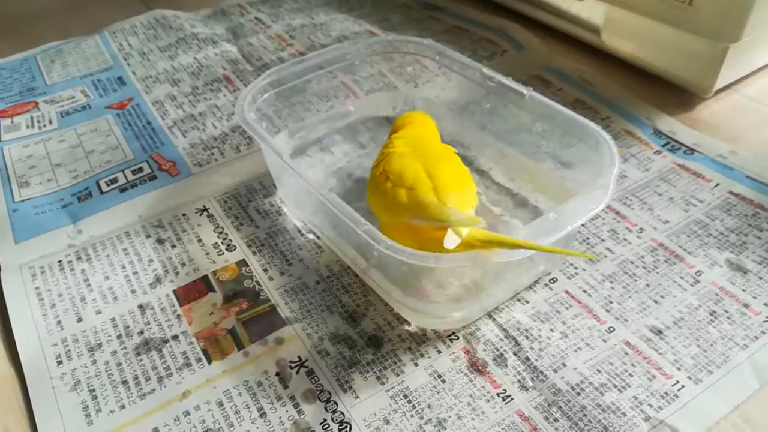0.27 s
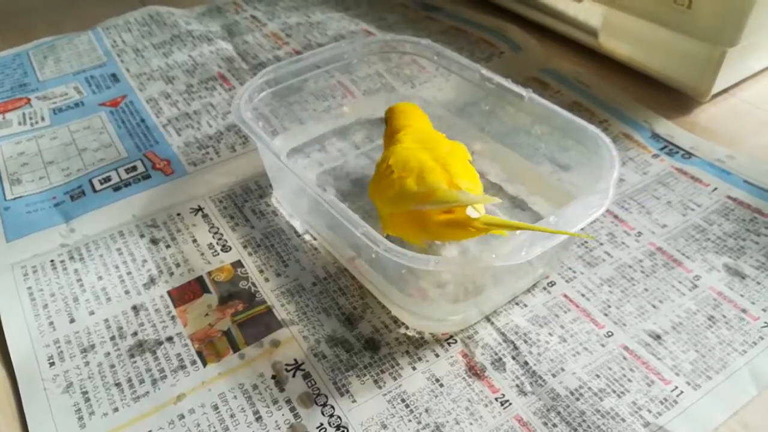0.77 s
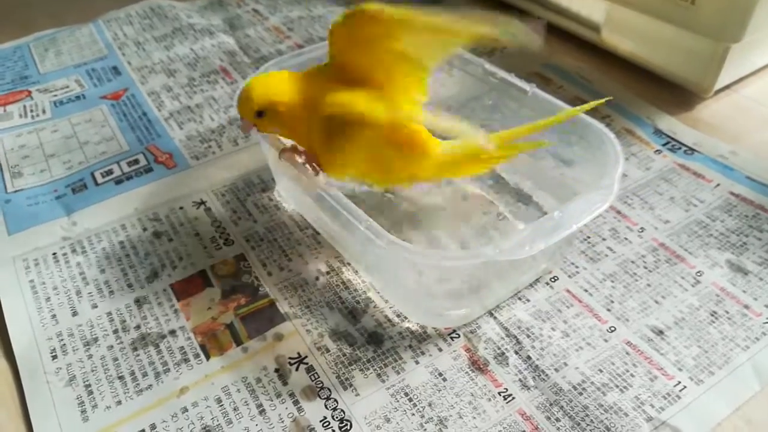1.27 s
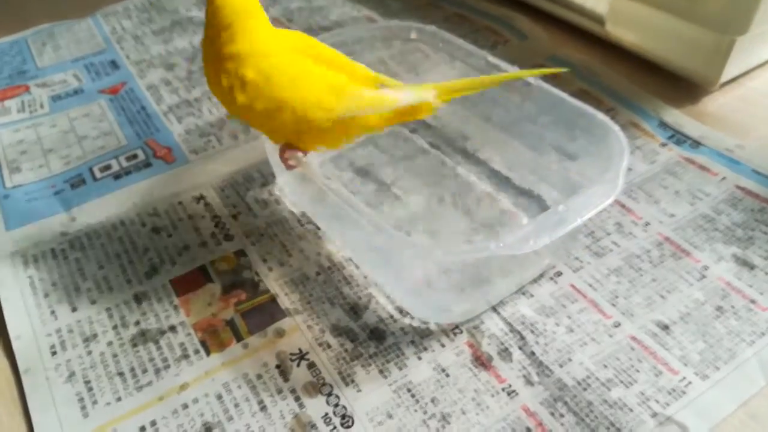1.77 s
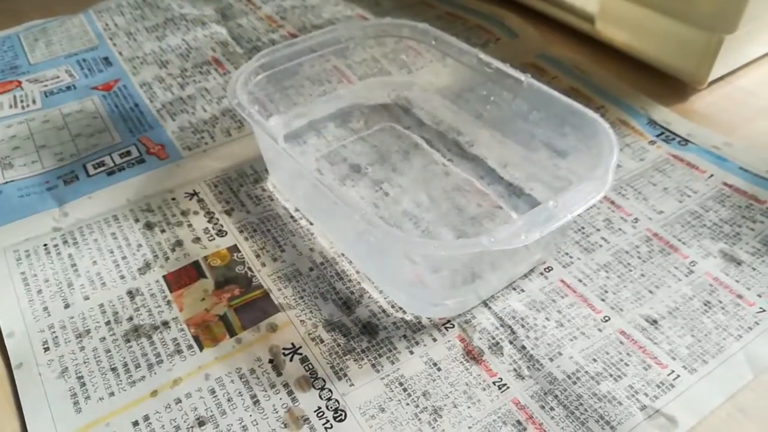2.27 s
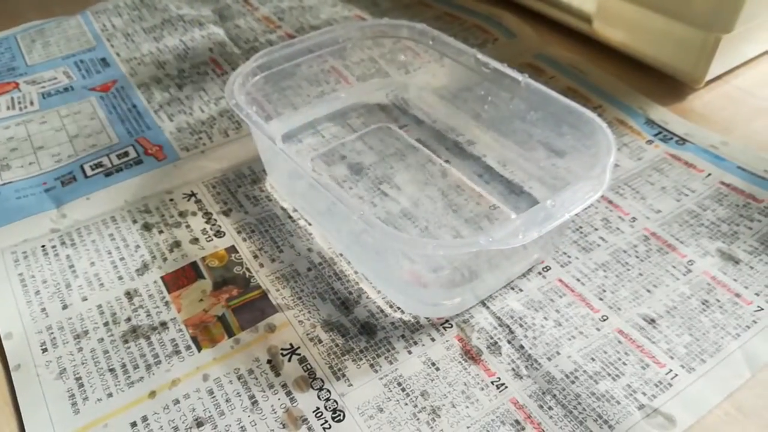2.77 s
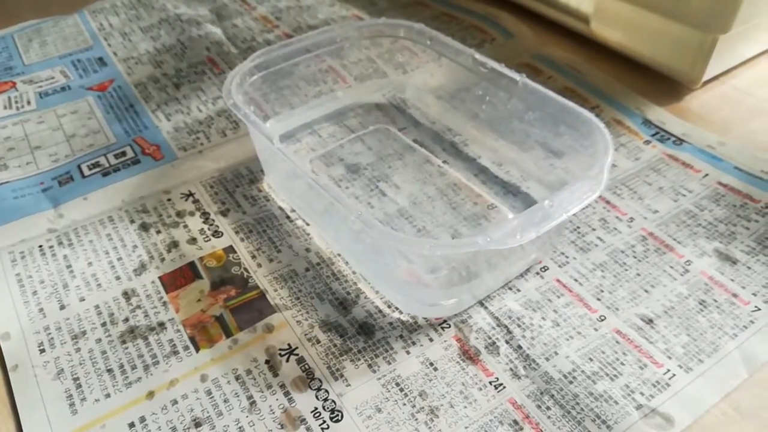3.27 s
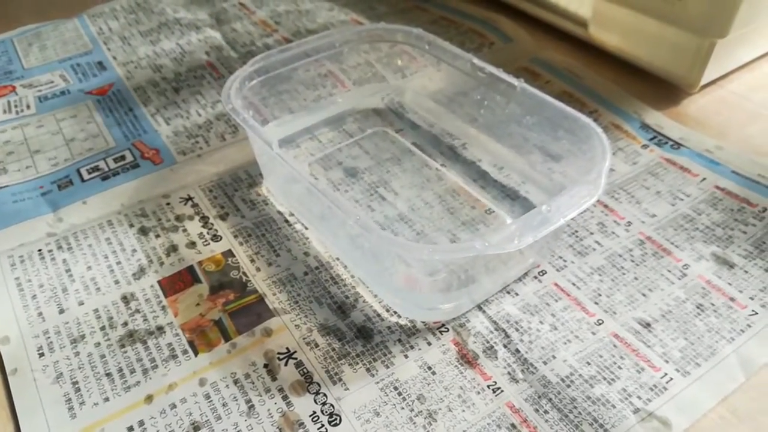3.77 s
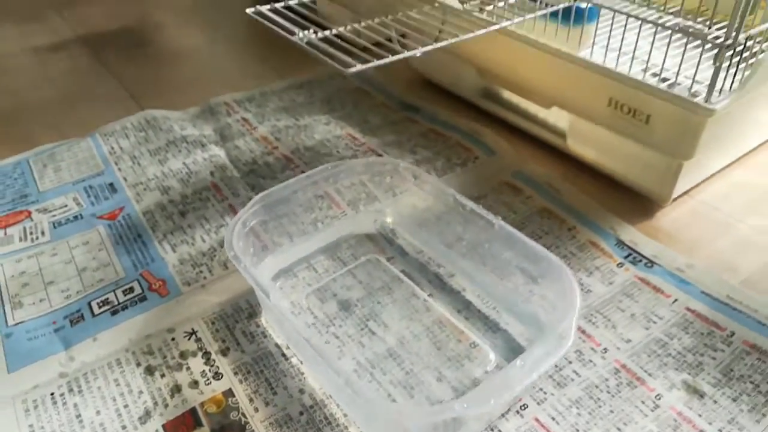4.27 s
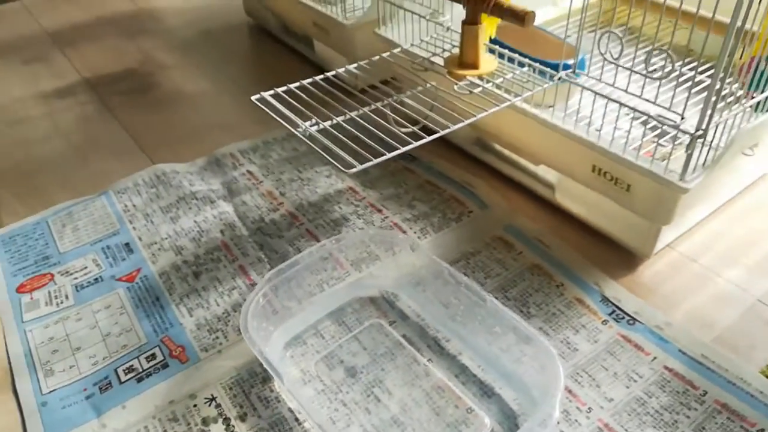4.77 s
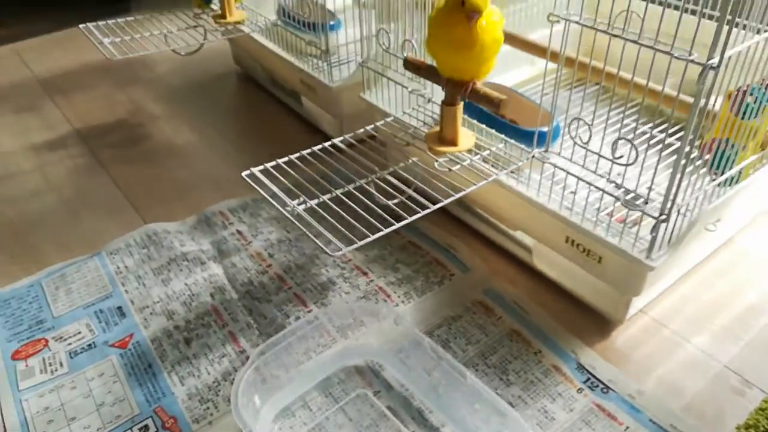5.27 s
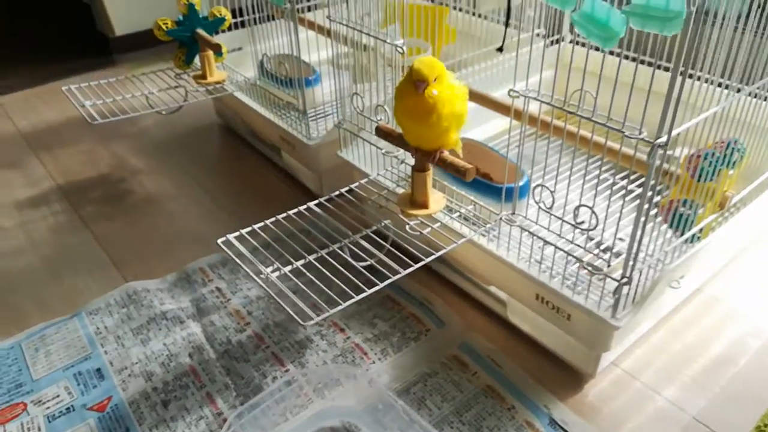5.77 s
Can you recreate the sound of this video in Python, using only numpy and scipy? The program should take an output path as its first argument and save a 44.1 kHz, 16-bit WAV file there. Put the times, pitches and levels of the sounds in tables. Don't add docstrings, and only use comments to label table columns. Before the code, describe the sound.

Complete silence until about 0.25 s, when the microphone wakes with a dull low thump; a faint toy bell dies away over quiet room tone and a low appliance hum. From 1.0 to 1.8 s, tiny crisp claw ticks and water drops tap a plastic tub and paper close by, with a harder foot strike on the rim at 1.33. At 1.9 comes the loudest sharp kick, feather rustle and three or four low wing pushes until 2.0, with drops spattering. A light rattle at 2.1, then from 2.7 to 3.1 the wire cage clatters, rings and squeaks a little farther away. At 3.65-3.87 a small bird makes a quick rising, warbling, falling whistle ending in a buzzy squawk, with short room echo. From 4.07 to 4.63, rapid light pecks on wires with faint bell trembling. From 5.1 to 5.8, soft claw clicks, weak rattles and squeaks on a perch.

```python
import sys
import numpy as np
from scipy import signal
from scipy.fft import rfft, irfft
from scipy.io import wavfile
from scipy.ndimage import uniform_filter1d

SR = 44100
rng = np.random.default_rng(int(sys.argv[2]) if len(sys.argv) > 2 else 0)


def materialize(psi):
    bounded = np.clip(np.atleast_2d(psi).T, -1, 1)
    quanta = np.round(bounded * 32767).astype(np.int16)
    wavfile.write(sys.argv[1], SR, quanta)


def field_ratio(decibels):
    return 10 ** (np.asarray(decibels, dtype=float) / 20)


N = 264952
T = np.arange(N) / SR
WAKE_AT = 11181


def evened(x):
    return x / np.sqrt(np.mean(x ** 2) + 1e-30)


def read(points, hz):
    f, value = np.transpose(points)
    return np.interp(np.log(hz + 1), np.log(f + 1), value)


def add(mix, s, sound):
    part = mix[..., round(s * SR):][..., :sound.shape[-1]]
    part += sound[..., :part.shape[-1]]


def curve(rows, column):
    rows = np.asarray(rows)
    fade = np.clip(np.minimum(T - rows[0, 0], rows[-1, 0] - T) / 0.004, 0, 1)
    return np.interp(T, rows[:, 0], rows[:, column]), fade


def peak(s, db, rise, fall):
    return field_ratio(db - np.where(T < s, abs(rise) * (s - T), abs(fall) * (T - s)))


def resonate(x, hz, width):
    r = np.exp(-np.pi * max(width, 1) / SR)
    poles = [1, -2 * r * np.cos(2 * np.pi * hz / SR), r * r]
    return signal.lfilter([(1 - r * r) / 2, 0, (r * r - 1) / 2], poles, x)


def resonate_twice(x, hz, width):
    return resonate(resonate(x, hz, width), hz, width)


def coloured(x, points, tilt_db=0):
    hz = np.fft.rfftfreq(x.shape[-1], 1 / SR)
    gain_db = read(points, hz) + tilt_db * np.log2((hz + 50) / 4000)
    return irfft(rfft(x) * field_ratio(gain_db), x.shape[-1])


def pair(length, same):
    a, b = rng.standard_normal((2, length))
    same = np.clip(same, 0, 1)
    return np.array([a, same * a + np.sqrt(1 - same ** 2) * b])


def panned(db):
    return field_ratio([[db / 2], [-db / 2]])


def whistle(rows, wobble, flutter, flutter_hz):
    (hz, fade), second_db = curve(rows, 1), curve(rows, 3)[0]
    hz = hz * (1 + wobble * evened(resonate(rng.standard_normal(N), 57, 33)))
    turn = 2 * np.pi * np.cumsum(hz) / SR
    upper = np.sin(2 * turn) + 0.1 * np.sin(3 * turn) + 0.05 * np.sin(4 * turn) + 0.03 * np.sin(5 * turn)
    tone = field_ratio(curve(rows, 2)[0]) * np.sin(turn) + field_ratio(second_db) * upper
    beat = 1 + flutter * evened(resonate(rng.standard_normal(N), flutter_hz, 47))
    return np.sqrt(2) * fade * tone * beat


# time_s, pitch_hz, partial_1_db, partial_2_db
INTRO_NOTE = [(3.65, 1570, -70, -88), (3.667, 1750, -69, -88), (3.677, 1900, -68, -85),
              (3.69, 2600, -65, -85)]
RISING_NOTE = [(3.687, 1600, -60, -62), (3.696, 1650, -48, -57), (3.706, 1670, -49, -58),
               (3.713, 1800, -54, -50), (3.721, 1880, -55, -46), (3.731, 1760, -52, -39),
               (3.737, 1730, -57, -45), (3.746, 2060, -49, -46), (3.756, 2040, -48, -44),
               (3.765, 1780, -54, -44)]
HELD_NOTE = [(3.755, 2428, -51, -70), (3.77, 2570, -41.5, -81), (3.8, 2700, -62, -74)]
GULPED_NOTE = [(3.765, 1442, -60, -65), (3.785, 1375, -49.5, -72)]
FALLING_NOTE = [(3.791, 3250, -42, -75), (3.8, 3114, -42, -75), (3.81, 3030, -42, -78),
                (3.822, 2900, -44, -80), (3.838, 2760, -46, -72), (3.8435, 2640, -36, -45),
                (3.8485, 2050, -38, -37), (3.853, 1650, -42, -35)]
SQUAWK_NOTE = [(3.849, 1650, -47, -40), (3.854, 1790, -46, -37), (3.861, 1770, -47, -39),
               (3.867, 1720, -54, -48)]
LOW_STRAND = [(3.765, 2015, -51, -80), (3.8, 2062, -54, -80), (3.838, 1980, -73, -83)]
# start_s, length_s, level_db, pulse_rate_hz
BUZZES = [
    (3.756, .045, -47, 330),
    (3.846, .021, -33.5, 400),
]
# centre_hz, width_hz, level_db
BEAK = [(1520, 970, -6.5), (2760, 890, 1), (3616, 300, 0), (4440, 400, -3), (5500, 800, -4),
        (8000, 600, -14.5)]


def bird():
    out = whistle(INTRO_NOTE, wobble=0.016, flutter=0.99, flutter_hz=90)
    out += whistle(RISING_NOTE, wobble=0.0092, flutter=0.37, flutter_hz=168)
    out += whistle(HELD_NOTE, wobble=0.075, flutter=0.27, flutter_hz=60)
    out += whistle(GULPED_NOTE, wobble=0.017, flutter=0.25, flutter_hz=100)
    out += whistle(FALLING_NOTE, wobble=0.006, flutter=0.3, flutter_hz=150)
    out += whistle(SQUAWK_NOTE, wobble=0.02, flutter=0.3, flutter_hz=300)
    out += whistle(LOW_STRAND, wobble=0.015, flutter=0.3, flutter_hz=120)
    for s, length, level_db, rate in BUZZES:
        t = T[:round(length * SR)]
        puffs = (0.5 + np.exp(-(t * rate % 1) / 1.2)) * rng.standard_normal(len(t))
        buzz = sum(field_ratio(db) * resonate_twice(puffs, hz, width) for hz, width, db in BEAK)
        envelope = signal.windows.tukey(len(t), 0.15) * field_ratio(-5 * t / length)
        add(out, s, field_ratio(level_db) * evened(buzz) * envelope)
    return signal.sosfilt(signal.butter(8, [1200, 8700], "band", fs=SR, output="sos"), out)


# start_s, peak_db, centre_hz, left_right_db
TICKS = [(0.9787, -51, 7500, 3), (1.05, -55, 7700, -2), (1.1885, -45, 5000, 5), (1.1974, -41.5, 7300, -7),
         (1.2376, -48, 4500, 0), (1.2615, -39.5, 4570, -2), (1.2622, -46, 8150, 8), (1.2792, -53, 7000, 0),
         (1.2865, -49, 7500, 0), (1.296, -48, 5000, 3), (1.3142, -38.5, 6800, 6), (1.4136, -37.5, 6900, -6),
         (1.4516, -40, 6400, 2), (1.4687, -44, 6200, 6), (1.493, -51, 6700, 1), (1.515, -45, 6340, 7),
         (1.528, -42, 7400, 4), (1.6024, -53, 6940, 1), (1.618, -48, 7600, 8), (1.7045, -53, 7250, 4),
         (1.811, -51.5, 6570, 3), (1.8375, -38.5, 8000, 6.5)]
BLOWS = [
    (1.3335, -26, 5470, 5),
    (1.336, -35, 4470, 2),
    (1.8975, -40, 8000, 1),
    (1.9, -22, 5400, 2.5),
    (1.9025, -34, 5000, 3),
]
KNOCKS = [
    (1.1885, -49, 2500, 4),
    (1.2376, -57, 2500, 1),
]
SPLATS = [(1.334, -41.5, 1080, 1), (1.4102, -50, 8500, 2), (1.4295, -52, 7200, 5), (1.4362, -42, 7070, 7),
          (1.4408, -48, 6500, 6), (1.5268, -46.5, 3330, 5), (1.876, -37.5, 6900, 8), (1.879, -44, 5250, 8),
          (1.9, -36.5, 1400, 6), (1.9005, -35, 3080, 6), (1.9192, -38, 6340, 0), (1.9725, -41.5, 7400, 5),
          (2.0118, -40.5, 7100, 8)]
PECKS = [(4.0725, -51, 7150, 5), (4.0854, -55, 7050, -9), (4.1674, -57, 6760, 4), (4.2084, -46.5, 6740, 3),
         (4.2486, -47, 6900, 4), (4.2886, -46.5, 4730, 1), (4.3323, -49.5, 6280, 3),
         (4.373, -41.5, 4700, 0.5), (4.4134, -40.5, 7950, 0), (4.455, -44, 4780, -1.0),
         (4.5405, -44, 8000, 1), (4.586, -44.5, 6840, 3.5), (4.6255, -48.5, 5700, -1)]
CLAWS = [(5.1841, -48, 6160, -1), (5.2058, -38, 6100, -2), (5.2673, -43.5, 5500, -3.0),
         (5.356, -49.5, 5800, -13), (5.5727, -64, 4200, -5), (5.614, -58, 3260, 0), (5.628, -56, 3000, 3),
         (5.7678, -55.5, 9400, 2)]
# pitch_hz, level_db, t60_s
TUB = [(230, -30, .03), (694, 0, .037), (860, -3, .028), (1150, -8, .02), (1430, -3, .035),
       (2450, -5, .025)]
TUB_DB_PER_OCTAVE = -18.5
THUD_HZ, THUD_DB = 453, 1


def ticks(rows, edge_hz, width, lag, crack_hz, crack_db, t60, tub_db, rise=0):
    out, t = np.zeros((2, N)), T[:3000]
    tub = sum(field_ratio(db - 60 * t / ring_s) * np.sin(2 * np.pi * hz * t) for hz, db, ring_s in TUB)
    tub = tub * np.minimum(t / 0.0012, 1)
    dull = signal.butter(2, min(edge_hz, 20000), fs=SR)
    for s, peak_db, hz, pan_db in rows:
        spray = pair(len(t), 0.053) * field_ratio(-60 * t / t60)
        spray[:, 0] += [4, 2.5]
        spray = spray * np.minimum((t + 1 / SR) / max(rise, 1 / SR), 1)
        thud = field_ratio(THUD_DB + 0.47 * (peak_db + 22.5)) * resonate(spray, THUD_HZ, THUD_HZ)
        crack = resonate(spray, crack_hz, 2 * crack_hz) + thud
        crack = field_ratio(0.5 * (peak_db + 29.5) + crack_db) * crack
        tick = signal.lfilter(*dull, resonate_twice(spray, hz, width * hz)) + crack
        tub_gain = field_ratio(tub_db + TUB_DB_PER_OCTAVE * np.log2(hz / 2500))
        tick = tick / abs(tick[0]).max() + tub_gain * tub / abs(tub).max()
        tick = 1.11 * field_ratio(peak_db) * panned(pan_db) * tick
        add(out[0], s, tick[0])
        add(out[1], s + lag / SR, tick[1])
    return out


# start_s, peak_db, t60_s, brightness_db_per_octave, left_right_db
JOLTS = [(2.0942, -43.5, 0.2, -5, 1), (2.655, -55, 0.44, 0, 2), (2.687, -42.5, 0.26, 5, 3),
         (2.71, -36.5, 0.48, 3.7, 1), (2.784, -28.5, 0.14, 3.5, 2), (2.8113, -43, 0.39, -3, -10),
         (2.854, -38.5, 0.26, 9.5, 13), (2.8872, -28.5, 0.13, 7, 4.5), (2.9045, -33, 0.14, 0, -3),
         (2.9506, -31.5, 0.16, 1.5, 1.5), (2.988, -37, 0.25, -3, 0), (3.0837, -31, 0.12, -0.5, 2.5),
         (3.097, -40, 0.037, 7, -11), (3.1249, -43.5, 0.33, -3.5, -1.5), (5.136, -54.5, 0.25, 1, -1),
         (5.2071, -45, 0.25, -4.5, -1), (5.3271, -50, 0.24, -6, -0.5), (5.6108, -54, 0.21, -9.5, -1)]
# pitch_hz, width_hz, level_db
WIRES = [(487, 6, -1), (1110, 200, 7.5), (1670, 48, 5.5), (2174, 170, -1), (3710, 450, 2.5),
         (8960, 75, -14), (5000, 420, -3), (5555, 51, -4), (6090, 24, -3), (6770, 31, -5), (7340, 75, -4.5),
         (7940, 350, 0), (9500, 55, -19), (11170, 230, -5.5), (12800, 13, -9), (14950, 98, -8),
         (14600, 50, 0)]
# frequency_hz, density_db
CLATTER = [(180, -41), (300, -14), (487, -17), (1370, 3), (1670, 2), (2760, -4), (6050, -1.5),
           (11400, -19.5), (13500, -27), (15200, -25), (16200, -42)]
TRAY_DB, TRAY_LAG = -7, 0.24
NEAR_WIRE_HZ, NEAR_WIRE_DB = 10000, 13.5


def cage():
    drive, t = np.zeros((2, N)), T[:16384]
    low, high = (signal.butter(3, 3200, kind, fs=SR) for kind in ("low", "high"))
    for s, peak_db, t60, tilt_db, pan_db in JOLTS:
        sizes = field_ratio(2.7 * np.minimum(rng.exponential(1, len(t)), 3))
        sizes = sizes * (rng.random(len(t)) < 900 / SR)
        bounces = coloured(pair(len(t), 0.29) * (0.5 + sizes), CLATTER, tilt_db)
        wires = evened(signal.lfilter(*high, bounces)) * field_ratio(-60 * t / t60) * np.minimum(t / 0.00089, 1)
        tray_gain = field_ratio(TRAY_DB - TRAY_LAG * (peak_db + 43.5) - 40 * t / t60)
        tray = evened(signal.lfilter(*low, bounces)) * tray_gain * np.minimum(t / 0.0089, 1)
        add(drive, s, field_ratio(peak_db - 13) * panned(pan_db) * (wires + tray))
    white = coloured(drive, [(hz, -0.9 * db) for hz, db in CLATTER])
    ring = np.zeros((2, N))
    for hz, width, db in WIRES:
        side = panned(NEAR_WIRE_DB * (hz > NEAR_WIRE_HZ))
        ring += field_ratio(db) * side * resonate(white, hz, 0.73 * width) / np.sqrt(width)
    return drive + field_ratio(0.7) * evened(ring) * np.std(drive)


# start_s, level_db, pitch_hz, t60_s
RINGS = [(2.085, -61, 3750, .1), (2.095, -56, 5980, 0.2), (2.686, -53, 9000, .1), (2.709, -61, 6090, .5),
         (2.785, -54, 6090, .5), (2.887, -51, 6090, 0.82), (2.95, -55, 7940, .3), (2.95, -51, 5000, .15),
         (2.97, -53, 3760, .3), (3.084, -55, 6090, 0.43), (3.088, -45.5, 3770, 0.16),
         (5.21, -60, 4000, .15)]
# start_s, level_db, pitch_hz, t60_s
LAST_RING = (0.256, -66, 2639, 1.1)


def rings():
    out, t = np.zeros((2, N)), T[:SR // 2]
    for s, db, hz, t60 in [LAST_RING] + RINGS:
        phase = 2 * np.pi * rng.random((2, 2, 1))
        tone = np.sin(2 * np.pi * hz * t + phase[0])
        tone = tone + 0.45 * np.sin(2 * np.pi * hz * 1.006 * t + phase[1])
        add(out, s, field_ratio(db - 60 * t / t60) * np.minimum(t / 0.002, 1) * tone)
    return out


# start_s, length_s, start_hz, end_hz, level_db
SQUEAKS = [(2.134, 0.044, 1670, 1670, -64), (2.685, 0.025, 1670, 1670, -59.5), (2.798, .1, 1640, 1660, -58),
           (2.882, 0.093, 1670, 1680, -55.5), (2.97, 0.087, 1129, 1060, -58.5),
           (3.091, 0.14, 1066, 1040, -63), (4.108, 0.014, 1600, 1620, -82), (5.205, 0.1, 1620, 1578, -65),
           (5.322, 0.08, 1600, 1650, -64.5), (5.379, .15, 1946, 1980, -72), (5.399, .12, 1607, 1550, -74),
           (5.47, 0.043, 947, 950, -66.5), (5.612, 0.12, 2200, 2290, -70.5), (5.616, 0.13, 950, 1117, -73)]


def squeaks():
    out = np.zeros((2, N))
    for s, length, start_hz, end_hz, db in SQUEAKS:
        t = T[:round(length * SR)]
        turn = 2 * np.pi * np.cumsum(np.linspace(start_hz, end_hz, len(t))) / SR
        fuzz = uniform_filter1d(pair(len(t), 0.4), size=170)
        add(out, s, field_ratio(db) * evened(fuzz * np.sin(turn)) * signal.windows.tukey(len(t), 0.5))
    return out


# peak_s, level_db, rise_db_per_s, fall_db_per_s, tilt_db_per_octave
RUSTLE = [(0.3, -65.5, 300, 22, -0.5), (1.238, -74.5, 117, 31, -7), (1.358, -64, 95, 267, 2.5),
          (1.45, -69, 60, 24, 7), (1.882, -55.5, 900, 52, 0.8), (1.93, -54, 508, 114, 0.3),
          (2.06, -78, 105, 26, -16), (2.742, -61, 221, 22, -4.5), (2.885, -49, 102, 89, 2),
          (3.06, -67, 66, 66, -7), (3.55, -80, 81, 18, -10), (3.74, -65.5, 139, 50, 1.5),
          (4.1, -70.5, 8, 30, 5.5), (4.486, -65, 34, 40, -0.4), (5.32, -65.5, 33, 11.5, -0.5),
          (5.85, -80.5, 35, 26, 6)]
# frequency_hz, density_db
FEATHER = [(150, -28), (250, -11.5), (314, -10.5), (477, -5.5), (664, -6.5), (1590, -2.5), (2380, -8),
           (7390, -12.5), (16200, -38.5)]


def rustle():
    sizes = field_ratio(2 * np.minimum(rng.exponential(1, N), 3))
    grains = pair(N, 0.1) * (1 + sizes * (rng.random(N) < 500 / SR))
    flicker = field_ratio(2 * evened(uniform_filter1d(rng.standard_normal(N), size=500)))
    dull, bright = (evened(coloured(grains, FEATHER, tilt_db)) for tilt_db in (-4, 4))
    out = np.zeros((2, N))
    for *stir, tilt_db in RUSTLE:
        share = np.clip(0.5 + tilt_db / 8, 0, 1)
        out += peak(*stir) * ((1 - share) * dull + share * bright)
    return out * flicker


# start_s, peak_db, pitch_hz, t60_s, sign (a factor that also scales
PUSHES = [
    (1.332, -43, 44, 0.22, 0.62),
    (1.887, -24.5, 49.7, 0.11, 0.79),
    (1.926, -38, 40.7, 0.13, 1),
    (1.949, -29.5, 45.5, 0.15, 0.95),
    (2.004, -38, 45.4, 0.14, 0.95),
]
# peak_s, level_db, rise_db_per_s, fall_db_per_s
SWAY = [
    (2.79, -56, 202, 71),
    (2.95, -53.5, 68, 696),
    (3.036, -69, 900, 302),
    (3.104, -60.5, 456, 112),
]


def thumps():
    out, t = np.zeros(N), T[:12000]
    for s, peak_db, hz, t60, sign in PUSHES:
        push = np.sin(2 * np.pi * hz * t) * np.minimum(t / 0.006, 1)
        add(out, s, sign * field_ratio(peak_db - 60 * t / t60) * push)
    rumble = evened(resonate_twice(rng.standard_normal(N), 62, 30.5))
    return out + sum(peak(*row) for row in SWAY) * rumble


# pitch_hz, level_db, t60_s, width_hz
BELL = [(4370, -65, 0.5, 70), (6490, -65, 0.45, 45)]
# peak_s, level_db, pitch_hz
TINKLE = [(4.265, -74, 4370), (4.315, -70, 4370), (4.335, -71, 4370), (4.385, -67, 4370),
          (4.405, -65, 4370), (4.425, -68, 4830), (4.455, -70, 4830), (4.49, -75, 4830), (4.61, -71, 4380),
          (4.652, -63, 4390), (4.71, -76, 4390)]
TINKLE_RISE, TINKLE_FALL = 280, 480


def bell():
    since = abs(T - WAKE_AT / SR)
    ring = np.zeros((2, N))
    for hz, db, t60, width in BELL:
        ring += field_ratio(db - 60 * since / t60) * evened(resonate(pair(N, 0.16), hz, width))
    for s, db, hz in TINKLE:
        ring += peak(s, db, TINKLE_RISE, TINKLE_FALL) * evened(resonate_twice(pair(N, 0.48), hz, 80))
    return ring


# frequency_hz, t60_s
ROOM = [(200, 0.27), (1000, 0.32), (3000, 0.32), (8000, 0.21), (15000, 0.056)]


def room(x):
    taps = np.zeros((2, SR // 2))
    at = np.arange(160, SR // 2 - 20, 20) + rng.integers(0, 20, (2, (SR // 2 - 161) // 20))
    np.put_along_axis(taps, at, rng.choice([-1., 1.], at.shape), 1)
    hz, t, z = signal.stft(taps, SR, nperseg=256)
    tail = signal.istft(z * field_ratio(-60 * t / read(ROOM, hz)[:, None]), SR, nperseg=256)[1]
    return signal.fftconvolve(x * np.ones((2, 1)), tail / np.linalg.norm(tail[0]), axes=1)[:, :N]


# frequency_hz, density_db
AIR = [(15, -42), (25, -4), (70, -6), (92, -12.5), (162, -4), (201, -12), (250, -15), (479, -19.5),
       (869, -18.5), (1050, -15.5), (1200, -19), (1450, -25.5), (2640, -24.5), (13000, -34.5),
       (16200, -34.5)]
AIR_DB = -67.5
# frequency_hz, likeness
SAME = [(40, 1), (200, 0.84), (500, 0.049), (1500, 0.081), (5000, 0.012)]
# centre_hz, width_hz
HUM = [(199.3, 40.5), (99.2, 28.4)]
HUM_DB, WANDER_DB, WANDER_S = (-71.5, -75.5), 1.5, 0.22
# peak_s, upper_band_db, lower_band_db
SWELL = [
    (0.33, -70, -59.5),
    (1.33, -65.5, -63),
    (1.93, -63, -56.5),
    (2.81, -67.5, -89),
    (3.05, -61, -66),
    (3.81, -59.5, -68),
    (4.13, -72, -80),
    (5.19, -75, -80),
]
SWELL_RISE, SWELL_FALL = 240, 94


def air():
    frames, hz = N // 512 + 5, np.fft.rfftfreq(2048, 1 / SR)
    a, b, c, d, patches = rng.standard_normal((frames, 1025, 5)).T
    patches = uniform_filter1d(uniform_filter1d(patches, size=20, axis=0), size=6, axis=1)
    same, left = np.clip(read(SAME, hz), 0, 1)[:, None], a + 1j * b
    z = np.array([left, same * left + np.sqrt(1 - same ** 2) * (c + 1j * d)])
    z = z * field_ratio(read(AIR, hz)[:, None] + 1.4 * evened(patches))
    tone = evened(signal.istft(z, nperseg=2048, noverlap=1536)[1][:, :N])
    wander = field_ratio(WANDER_DB * evened(uniform_filter1d(rng.standard_normal(N), round(WANDER_S * SR))))
    hum = np.zeros((2, N))
    for k, (centre_hz, width) in enumerate(HUM):
        band = evened(resonate_twice(pair(N, 0.96), centre_hz, width))
        swell = sum(peak(row[0], row[k + 1], SWELL_RISE, SWELL_FALL) for row in SWELL)
        hum += (field_ratio(HUM_DB[k]) * wander + swell) * band
    return field_ratio(AIR_DB) * tone + hum


def scene():
    near = ticks(TICKS, edge_hz=7500, width=0.77, lag=9.9, crack_hz=2220, crack_db=-10.5, t60=0.0096, tub_db=-7)
    near += ticks(BLOWS, edge_hz=8500, width=0.94, lag=8.6, crack_hz=1200, crack_db=-9.5, t60=0.013, tub_db=-9)
    near += ticks(KNOCKS, edge_hz=6000, width=0.6, lag=9, crack_hz=1500, crack_db=-20, t60=0.015, tub_db=6)
    near += ticks(SPLATS, edge_hz=12400, width=0.47, lag=9, crack_hz=5000, crack_db=-10.5, t60=0.016,
                  tub_db=-51, rise=0.0012)
    near += ticks(PECKS, edge_hz=10500, width=1, lag=13, crack_hz=4900, crack_db=8, t60=0.037, tub_db=-22)
    near += ticks(CLAWS, edge_hz=4700, width=0.96, lag=5.6, crack_hz=3450, crack_db=-18, t60=0.053, tub_db=-31)
    far, voice = cage(), bird()
    voiced = field_ratio(2) * np.array([voice, np.roll(voice, 4)])
    wet = room(field_ratio(-10) * near + field_ratio(-2) * far + field_ratio(-3) * voice)
    return near + far + voiced + wet + rustle() + squeaks() + thumps() + bell() + rings() + air()


def roll_off(x):
    return signal.sosfilt(signal.butter(12, 16520, fs=SR, output="sos"), x)


# size, hold_s, fading_s, rebound_share, rebound_s
STEP = (-0.048, 0.024, 0.16, 0.43, .0009)


def record(dry):
    size, hold, fading, rebound, rebound_s = STEP
    t = T - WAKE_AT / SR
    offset = size * np.exp(-(np.maximum(t - hold, 0) / fading) ** 2)
    offset = offset * (1 - rebound * np.exp(-((t - rebound_s / 2) / (rebound_s / 3)) ** 2))
    awake = np.clip(t * SR / 3, 0, 1)
    band = signal.firwin(301, 16050, window=("kaiser", 8), fs=SR)
    heard = signal.oaconvolve(awake * (dry + offset), band[None], "same")
    return roll_off(heard)


dry = scene()
out = record(dry)
materialize(out)
```